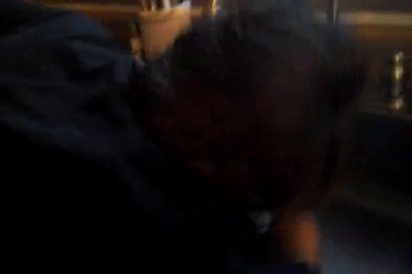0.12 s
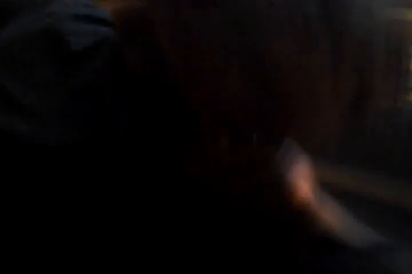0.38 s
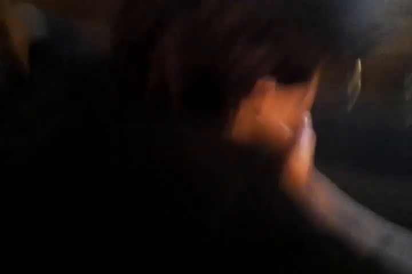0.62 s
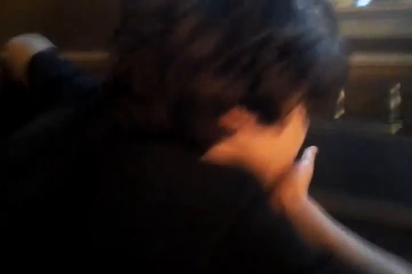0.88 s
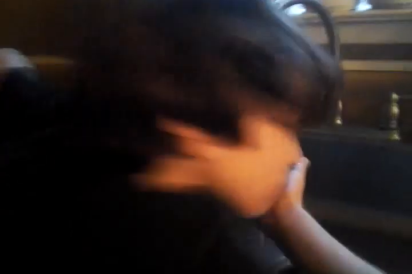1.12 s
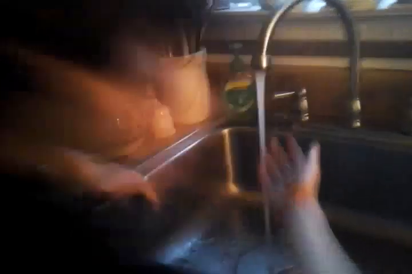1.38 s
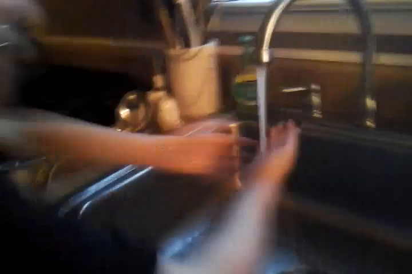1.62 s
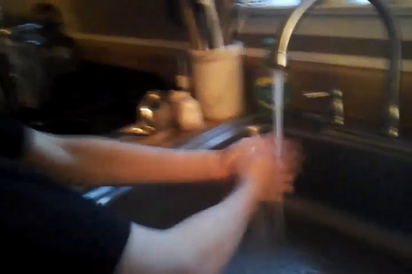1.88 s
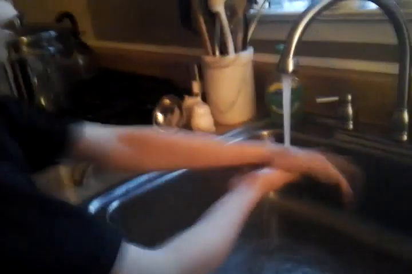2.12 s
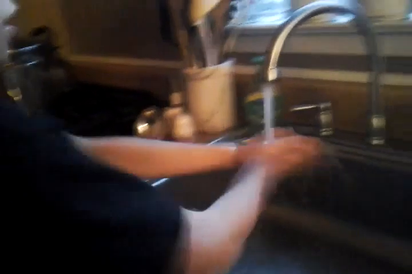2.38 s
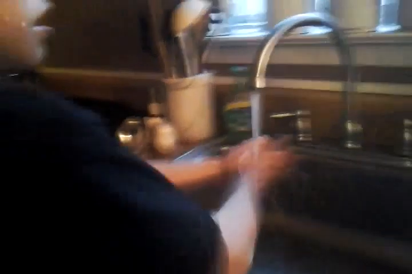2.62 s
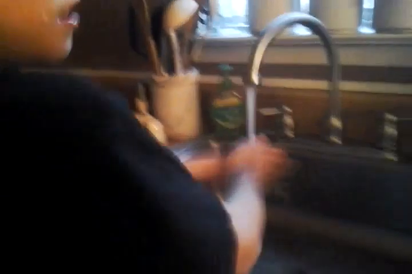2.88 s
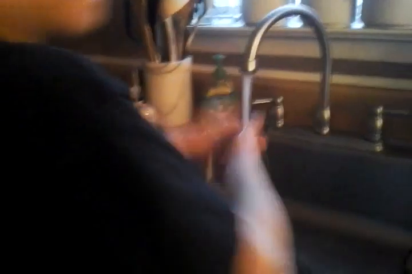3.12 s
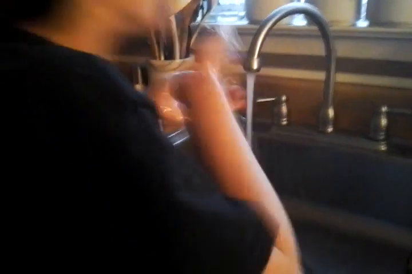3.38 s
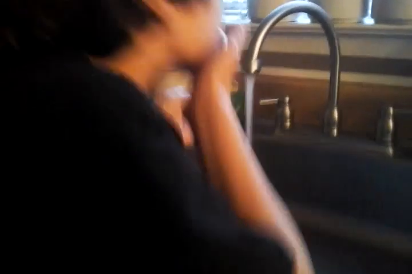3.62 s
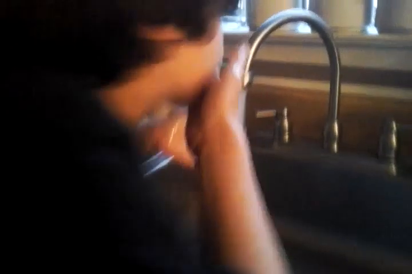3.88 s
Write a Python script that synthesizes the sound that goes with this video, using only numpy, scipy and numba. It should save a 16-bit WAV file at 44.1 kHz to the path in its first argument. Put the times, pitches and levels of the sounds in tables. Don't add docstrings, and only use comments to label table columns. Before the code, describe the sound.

A kitchen tap runs into a steel sink, close and bright. Silence until about 0.4 s, then fizzing, ticking water fades in over faint basin drumming and low appliance hum. Handfuls spill around 0.65 and 1.2-1.6 s, with a splash at 1.9 s and scattered drops after. Dull handling bumps recur from 1.3 s. The flow thins near 3.1 s; a big pour and sharp slap hit at 3.45 s, then strong splashes until 4 s.

```python
import sys
import numpy as np
from scipy import signal
from scipy.fft import rfft, irfft
from scipy.io import wavfile
from scipy.ndimage import uniform_filter1d
from numba import njit

SR = 44100
rng = np.random.default_rng(int(sys.argv[2]) if len(sys.argv) > 2 else 0)


def magnitude_from_level(level_db):
    exponent = np.asarray(level_db, float) / 20
    return 10 ** exponent


def output_pcm(signal):
    pcm = np.clip(np.atleast_2d(signal).T, -1, 1) * 32767
    wavfile.write(sys.argv[1], SR, np.round(pcm).astype(np.int16))


N = 176400

SPLASH_HZ = 5282


def level(x, db):
    return x * magnitude_from_level(db) / np.sqrt(np.mean(x ** 2))


def curve(points, hz):
    point_hz, point_db = np.array(points, float).T
    return np.interp(np.log(np.maximum(hz, 1)), np.log(np.maximum(point_hz, 1)), point_db)


def noise(points):
    hz = np.arange(N // 2 + 1) * SR / N
    spectrum = rfft(rng.standard_normal(N)) * magnitude_from_level(curve(points, hz))
    return level(irfft(spectrum, N), 0)


def walk(rate):
    hold = int(SR / rate)
    levels = np.clip(rng.standard_normal(N // hold + 1), -1.3, 1.3)
    steps = np.repeat(levels, hold)
    return 1.4 * uniform_filter1d(uniform_filter1d(steps, hold), hold)[:N]


def high_pass(x, order, hz):
    return signal.sosfilt(signal.butter(order, hz, 'high', fs=SR, output='sos'), x)


@njit
def ring(n, at, step, cycles, size, glide):
    out = np.zeros(n)
    for g in range(len(at)):
        i = int(at[g])
        turn = np.exp(1j * step[g] - step[g] / (2 * np.pi * cycles[g]))
        z = size[g] * np.exp(1j * step[g] * (i + 1 - at[g]))
        length = int(6 * 2 * np.pi * cycles[g] / step[g])
        up = np.exp(1j * step[g] * glide / length)
        for k in range(max(i + 1, 0), min(i + 1 + length, n)):
            out[k] += z.imag
            z *= turn
            turn *= up
    return out


def droplets(s, hz, cycles, size, glide=0.537):
    left_late_s, spread_s = 0.000782, 0.000583
    echo_s, echo_db = .004, -5.5
    s, hz, cycles, size = (np.ravel(v) * 1. for v in np.broadcast_arrays(s, hz, cycles, size))
    step = 2 * np.pi * np.clip(hz, 100, 15500) / SR
    cycles = np.maximum(cycles, .5)
    path = rng.random((len(s), 2)).T
    echo = rng.exponential(size=(len(s), 4)).T
    sizes = np.concatenate([size, magnitude_from_level(echo_db) * size, -magnitude_from_level(echo_db) * size])
    out = []
    for k, late in enumerate((left_late_s, 0)):
        direct = s + late + spread_s * path[k]
        at = np.concatenate([direct, direct + echo_s * echo[k], direct + echo_s * echo[k + 2]]) * SR
        out.append(ring(N, at, np.tile(step, 3), np.tile(cycles, 3), sizes, glide))
    return np.array(out)


def spray(flow_db, count=20000):
    # pitch_hz [Hz], level_db [dB per Hz]
    colour = [(300, -38), (900, -74), (2000, -11), (2800, -4), (5500, -3.5), (8000, -4), (11000, -5.5),
              (14700, -18)]
    ticks_db, hiss_db, scatter_db = -4, -1, 2.5
    when, pitch, length = rng.random((count, 3)).T
    hz = 800 * 19 ** pitch
    cycles = 0.94 + 15.0 * length ** 3
    size_db = curve(colour, hz) + scatter_db * rng.exponential(size=count)
    ticks = droplets(when * N / SR, hz, cycles, hz * magnitude_from_level(size_db))
    hiss = np.array([noise(colour), noise(colour)])
    flutter_db = 1.3 * walk(24.15) + 1.06 * walk(70)
    return (level(ticks, ticks_db) + magnitude_from_level(hiss_db) * hiss) * magnitude_from_level(flow_db + flutter_db)


def basin(flow_db):
    # pitch_hz [Hz], level_db [dB per Hz]
    mid_colour = [(30, -45), (110, -12), (200, -3), (555, -5), (907, -4.5), (2000, -8), (4000, -6.5),
                  (9000, -46)]
    # pitch_hz [Hz], level_db [dB per Hz]
    side_colour = [(30, -28), (80, -13), (130, -15), (190, 8), (300, -0.5), (600, -7.5), (1500, -12.5),
                   (9000, -21)]
    mid_db, side_db = -44.5, -39.5
    hum_hz, hum_db, hum_mid_db = 237.6, -42, -24
    hum = np.sin(2 * np.pi * hum_hz * np.arange(N) / SR)
    hum = np.sqrt(2) * magnitude_from_level(hum_db + 0.46 * walk(3.0)) * hum
    swell = magnitude_from_level(0.026 * (flow_db - flow_db.mean()) + walk(24))
    mid = magnitude_from_level(mid_db) * noise(mid_colour) * swell + magnitude_from_level(hum_mid_db) * hum
    side = magnitude_from_level(side_db) * noise(side_colour) * swell + hum
    return np.array([mid + side, mid - side])


def bursts(at, db, hz, decay, octaves, rise_s, count=260):
    scatter_db = 1.5
    decay = np.clip(decay, .005, .2)
    at, db, hz, decay = (np.asarray(v)[:, None] for v in (at, db, hz, decay))
    shape = (len(at), count)
    extra_size, extra_cycles = rng.exponential(size=(2, *shape))
    late = 3 * decay * rng.random(shape)
    drop_hz = hz * 2 ** (octaves * rng.standard_normal(shape))
    size = magnitude_from_level(db + scatter_db * extra_size) * np.exp(-late / decay) * (1 - np.exp(-late / rise_s))
    size = size * np.sqrt(drop_hz / hz * decay / 0.02)
    return droplets(at + late, drop_hz, 3.65 + 2.37 * extra_cycles, size)


def splash(table, rise_s):
    splash_db, mist_db, mist_hz = -18, 0, 8580
    s, db, octs, decay = np.array(table).T
    db = db + splash_db
    body = bursts(s, db, SPLASH_HZ * 2 ** octs, decay, 0.369, rise_s, count=300)
    mist = bursts(s, db + mist_db + 8 * octs, mist_hz + 0 * s, .8 * decay, 0.616, rise_s, count=140)
    return body + mist


def hands():
    # start_s [s], level_db [dB], pitch_octaves [octaves above middle], decay_s [s]
    pours = [
        (.575, -12, 0.15, 0.056),
        (.61, -5.5, 0.26, 0.043),
        (.655, -0.5, 0.15, 0.034),
        (1.215, -9, 0.16, 0.03),
        (1.42, -6.5, -0.0098, 0.059),
        (3.195, -9.5, -0.223, .04),
        (3.405, -4.5, 0.0094, 0.04),
        (3.435, 4.5, -0.11, 0.03),
    ]
    # start_s [s], level_db [dB], pitch_octaves [octaves above middle],
    # decay_s [s]
    splashes = [(.858, -13, -0.14, 0.032), (.927, -15, -0.14, 0.038), (1.082, -19, 0.14, 0.04),
                (1.227, -12, 0.21, 0.034), (1.31, -14, 0.65, 0.019), (1.474, -10.5, 0.51, 0.036),
                (1.535, -9, 0.34, 0.041), (1.611, -10, 0.31, 0.046), (1.707, -15.5, 0.25, 0.034),
                (1.916, -7, 0.17, 0.073), (1.976, -25, 0.45, 0.047), (2.093, -20, 0.16, 0.025),
                (2.256, -13.5, 0.026, 0.029), (2.34, -18.5, 0.25, 0.031), (2.485, -17.5, -0.3, 0.026),
                (2.674, -14, -0.21, 0.034), (2.787, -19.5, -0.345, .025), (2.874, -17.5, 0.032, 0.029),
                (2.948, -30, -0.34, 0.023), (3.309, -17.5, -0.22, 0.039), (3.389, -24.5, -0.29, 0.01),
                (3.597, -4.5, -0.27, 0.028), (3.647, -10, -0.36, 0.021), (3.775, -10.5, 0.48, 0.042),
                (8.5, -13, 0.38, 0.013), (3.853, -15, 0.013, 0.051), (3.897, -19, -0.64, 0.026),
              (3.948, -10.5, 0.026, .03), (3.982, -23, -0.42, 0.057), (0.64, -24, -0.14, 0.038),
              (.99, -18, 0.185, 0.035), (1.038, -22.5, .1, .03), (1.125, -26, 0.12, .03),
              (.79, -19.5, .1, .03), (3, -23, .2, .04), (1.16, -33, 0.013, 0.019),
              (2.845, -18.5, 0.26, 0.026), (3.098, -22, -0.11, 0.034), (3.063, -23.5, -0.06, 0.025),
              (1.7, -26, .15, .015), (2.008, -16, 0.11, 0.012), (0.46, -36, .2, 0.067),
              (3.8, -5, -0.43, 0.047), (2.9, -21, -0.04, 0.017), (2.555, -33, .1, 0.029)]
    # start_s [s], level_db [dB], pitch_hz [Hz], decay_s [s]
    slaps = [
        (1.25, -40, 504, 0.027),
        (1.93, -42, 349, .04),
        (1.99, -38.5, 502, .04),
        (2.012, -28, 1014, 0.023),
        (2.362, -40.5, 312, 0.045),
        (3.441, -20, 2098, 0.059),
        (3.45, -35, 596, 0.036),
        (3.532, -51, 900, .03),
        (3.79, -42, 510, .03),
    ]
    # start_s [s], level_db [dB], pitch_hz [Hz], decay_s [s]
    cups = [(2.247, -35, 2360, 0.044), (2.262, -38.5, 2970, 0.029), (3.433, -27, 4250, 0.014),
            (2.486, -27, 4550, 0.026), (2.788, -33.5, 4290, 0.024), (2.949, -30.5, 3940, 0.025),
            (3.309, -35.5, 3100, 0.029), (3.39, -27, 4340, 0.01), (3.597, -30, 4400, 0.028),
            (3.897, -39, 3125, 0.022), (.927, -36, 4140, 0.024), (1.83, -38.5, 2950, 0.027)]
    # start_s [s], level_db [dB], pitch_octaves [octaves above middle]
    drops = [(0.6811, -3, 0.093), (0.7384, -40, 0.28), (0.8584, -8.5, 0.057), (0.873, -20, 0.14),
             (1.251, -17, 0.18), (1.3118, -7, 0.34), (1.4306, -28, 0.25), (1.449, -32, 0.25),
             (1.4743, 6.5, 0.69), (1.515, 2.5, 0.3), (1.537, -5, 0.09), (1.5495, -16, 0.22),
             (1.5546, -7, 0.12), (1.611, -5, 0.41), (1.627, -11, 0.23), (1.676, -5.5, 0.42),
             (1.916, -2, 0.54), (1.943, -5, 0.2), (1.9759, -14, 0.17), (2.3395, -11, 0.33),
             (2.485, -9, -0.23), (2.682, -7, -0.18), (2.491, -17, -0.28), (2.787, -8, -0.23),
             (2.8434, -24, .1), (2.881, -21, -0.076), (2.3535, -4, .2), (2.2462, -11, -0.27),
             (1.923, -13, .15), (1.226, -15, -0.052), (3.9578, -9, .2), (3.766, -9, 0.91),
             (3.812, -7, 0.75), (3.83, -8.5, .9), (3.868, -4, 1), (3.939, -3, 0.85), (3.373, -11, 1),
             (1.2532, -0.5, 0.94), (2.697, -15, 1), (1.0, -10, .2), (1.012, -10, .2), (1.027, -13, .2),
             (3.0174, -22, 0.37), (3.3907, -8, -0.35), (3.434, -4, -0.38), (3.4647, -16, 0.19),
             (3.476, -13, .15), (3.6046, -7, 0.24), (3.6193, -18, -0.12), (3.65, -10, -0.42),
             (3.6585, -19, .3), (3.4491, -9, 0.15), (3.4598, 3.5, 0.49), (3.536, -7, 0.44),
             (3.598, -12, 0.19), (3.7957, -2.5, 0.75), (3.854, -1, 0.33)]
    out = splash(splashes, 0.0014) + splash(pours, 0.037)
    out = high_pass(out, 4, 1700)
    s, db, hz, decay = np.array(slaps).T
    out = out + bursts(s, db - 10, hz, decay, .9, 0.002, count=200)
    s, db, hz, decay = np.array(cups).T
    out = out + bursts(s, db + 1.5, hz, decay, .14, 0.0014, count=110)
    s, db, octs = np.array(drops).T
    return out + droplets(s, SPLASH_HZ * 2 ** octs, 2.5, magnitude_from_level(db - 7))


def handling():
    # middle_s [s], length_s [s], level_db [dB]
    moves = [(0.557, .08, -74), (.68, .06, -84), (1.285, 0.079, -59), (1.38, .06, -70), (1.47, .05, -61),
             (1.618, .08, -64), (1.75, .15, -68), (1.92, 0.066, -63), (2.1, .15, -68), (2.304, 0.28, -70),
             (2.5, 0.1, -62), (2.75, 0.24, -71), (2.947, .08, -71), (3.4, 0.091, -77), (3.78, .06, -67)]
    t = np.arange(N) / SR
    swell = sum(magnitude_from_level(db) * np.exp(-(2 * (t - s) / length) ** 2) for s, length, db in moves)
    low_pass = signal.butter(2, 60.4, fs=SR, output='sos')
    rumble = signal.sosfilt(low_pass, rng.standard_normal((2, N)))
    return level(rumble, 5.7) * swell


def hollows(x):
    # middle_s [s], length_s [s], pitch_hz [Hz]
    gaps = [(.66, .1, 1700), (.78, .06, 1850), (.87, .05, 1550), (.96, .06, 1950), (1.02, .07, 1600),
            (1.19, .09, 1300), (1.54, .05, 800), (1.95, .08, 1500), (3.615, .07, 1230), (3.68, .07, 1230),
            (3.67, .07, 1780), (3.74, .06, 1650), (3.87, .09, 1820), (3.97, .07, 1520), (3.64, .07, 600),
            (1.0, .08, 880)]
    half_hz = 120
    t = np.arange(N) / SR
    for s, length, hz in gaps:
        band_pass = signal.butter(2, [hz - half_hz, hz + half_hz], 'band', fs=SR, output='sos')
        band = signal.sosfiltfilt(band_pass, x)
        x = x - band * np.exp(-(2 * (t - s) / length) ** 4)
    return x


def echoes():
    t60_s, tail_db = .2, -11
    t = np.arange(SR // 3) / SR
    tail = rng.standard_normal((2, len(t))) * magnitude_from_level(-60 * t / t60_s) * (t > .008)
    tail *= magnitude_from_level(tail_db) / np.sqrt(np.sum(tail ** 2, axis=1, keepdims=True))
    tail[:, 0] = 1
    return tail


def scene():
    # time_s [s], level_db [dB]
    flow = [(0.54, -32), (0.6, -30), (0.76, -27), (0.82, -28.5), (0.96, -29), (1.29, -27.5), (1.46, -31),
            (1.6, -28.5), (1.74, -35), (1.97, -27), (2.12, -31.5), (2.87, -32.5), (3.1, -35.5),
            (3.38, -33.5), (3.49, -24), (3.67, -26.5), (3.84, -30.5), (4.0, -25)]
    t = np.arange(N) / SR
    flow_s, flow_level = np.array(flow).T
    flow_db = np.interp(t, flow_s, flow_level)
    stream = spray(flow_db - 5.0)
    top = high_pass(stream, 1, 7900)
    stream = stream + top * (magnitude_from_level(0.75 * (flow_db - flow_db.mean())) - 1)
    water = high_pass(stream + hands(), 2, 250)
    water = water * magnitude_from_level(np.array([[-2], [0]]))
    water = signal.fftconvolve(water, echoes(), axes=1)[:, :N]
    filling = np.clip((t - .376) / 0.36 + 0.14, 0, 1)
    return hollows(water + filling * basin(flow_db)) + handling()


def top_cut(x):
    return signal.sosfilt(signal.butter(12, 15270, fs=SR, output="sos"), x)


def record(dry):
    # ring_hz [Hz], width_hz [Hz], ring_db [dB], level_db [dB]
    ports = [
        (5900, 1800, -2.5, -1.5),
        (5854, 1070, 12.5, -1.5),
    ]
    fade_from_s, fade_s, ceiling = .376, .065, .95
    out = []
    for x, (hz, width, ring_db, db) in zip(dry, ports):
        ringing = signal.lfilter(*signal.iirpeak(hz, hz / width, SR), x)
        out.append(magnitude_from_level(db) * (x + magnitude_from_level(ring_db) * ringing))
    fade = np.clip((np.arange(N) / SR - fade_from_s) / fade_s, 0, 1)
    rounded = ceiling * np.tanh(np.array(out) / ceiling)
    low_pass = signal.ellip(10, .3, 70, 14650, fs=SR, output='sos')
    heard = signal.sosfilt(low_pass, high_pass(rounded, 2, 15)) * fade
    return top_cut(heard)


dry = scene()
out = record(dry)
output_pcm(out)
```